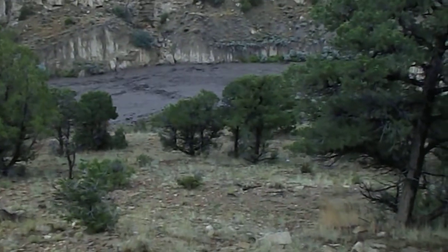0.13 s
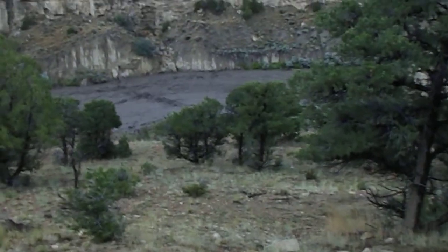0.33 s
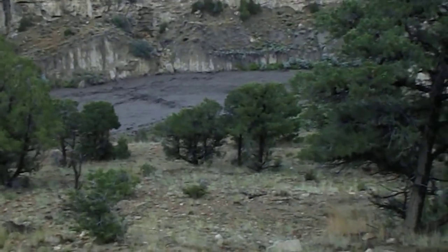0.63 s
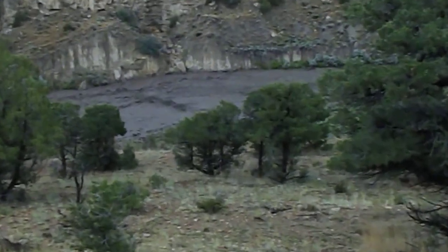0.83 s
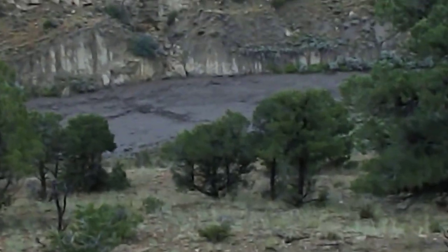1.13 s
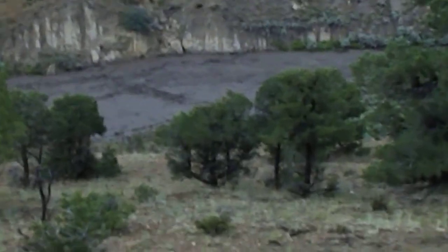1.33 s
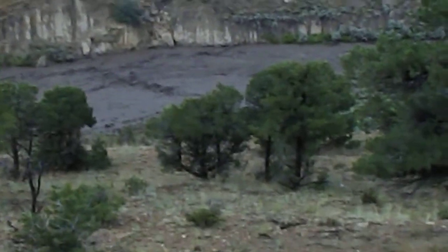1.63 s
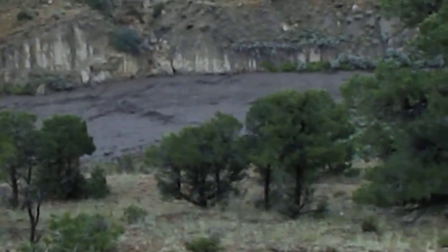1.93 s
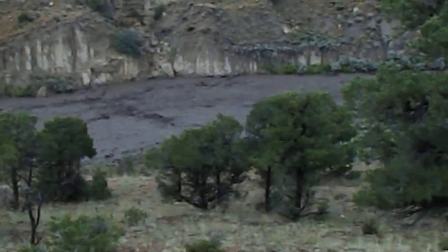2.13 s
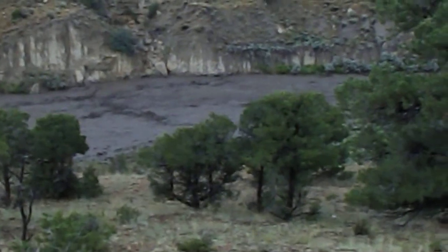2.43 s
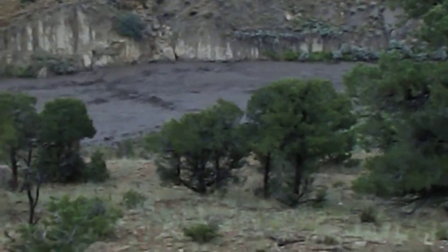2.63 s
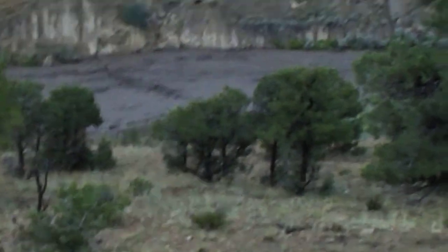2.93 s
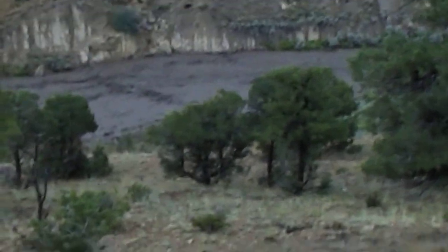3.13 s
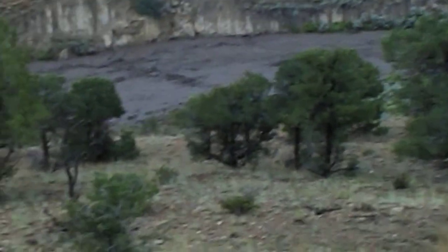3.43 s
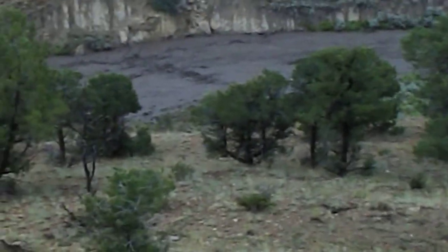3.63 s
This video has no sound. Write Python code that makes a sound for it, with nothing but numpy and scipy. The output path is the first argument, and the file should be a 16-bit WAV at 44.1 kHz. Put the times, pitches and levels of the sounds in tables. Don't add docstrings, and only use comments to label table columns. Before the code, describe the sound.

A distant muddy flood rushes continuously for about four seconds, a dull low-mid roar with blurred stone knocks and thin spray hiss. It swells slightly around 1.1 and 2 seconds and is weakest at the end. At 1.44-1.47 seconds a close plastic button snaps in a rapid cluster, clipping and briefly ducking the water; a single lighter click follows at 2.11. Open valley, band-limited handheld camera microphone.

```python
import sys
import numpy as np
from scipy import signal
from scipy.fft import rfft, irfft, next_fast_len
from scipy.io import wavfile
from scipy.ndimage import uniform_filter1d, map_coordinates

SR = 44100
rng = np.random.default_rng(int(sys.argv[2]) if len(sys.argv) > 2 else 0)


def gain_from_decibels(decibels):
    exponent = np.asarray(decibels, float) / 20
    return 10 ** exponent


def digitize_waveform(pressure):
    field = np.atleast_2d(pressure).T
    bounded = np.clip(field, -1, 1)
    quanta = np.round(bounded * 32767).astype(np.int16)
    wavfile.write(sys.argv[1], SR, quanta)


N = 166257


def unit(x):
    return x / np.sqrt(np.mean(x ** 2) + 1e-20)


def along(points, hz):
    point_hz, level_db = np.transpose(points)
    return np.interp(np.log(hz + 1), np.log(point_hz + 1), level_db)


def wobble(knots_per_s):
    knots = rng.standard_normal(int(N * knots_per_s / SR) + 4)
    return map_coordinates(knots, [np.arange(N) * knots_per_s / SR])


def filtered(x, response):
    size = next_fast_len(N + 8192)
    gain = response(np.fft.rfftfreq(size, 1 / SR))
    return irfft(rfft(x, size) * gain, size)[:N]


def smooth(x, tau_s):
    keep = np.exp(-1 / (abs(tau_s) * SR))
    return signal.lfilter([1 - keep], [1, -keep], x)


def rush(spectrum, patchy_db):
    z = signal.stft(rng.standard_normal(N + 512), nperseg=512)[2]
    patches = uniform_filter1d(rng.standard_normal(z.shape), size=4, axis=0)
    patches = uniform_filter1d(patches, size=12, axis=1)
    x = signal.istft(z * gain_from_decibels(patchy_db * unit(patches)), nperseg=512)[1][:N]
    return unit(filtered(x, lambda hz: gain_from_decibels(along(spectrum, hz))))


# start_s, level_db
SURGES = [
    (0.0, -34),
    (0.84, -33),
    (1.13, -31.5),
    (1.61, -33),
    (1.99, -32),
    (2.26, -33.5),
    (3.08, -32.5),
    (3.26, -33.5),
    (3.77, -34.5),
]


def flood():
    start_s, level_db = np.transpose(SURGES)
    strength_db = np.interp(np.arange(N) / SR, start_s, level_db)
    mean_db = strength_db.mean()
    surge_db = strength_db - mean_db
    shared_db = 0.48 * wobble(9)
    low = roar(surge_db + shared_db)
    high = spray(surge_db, shared_db)
    return gain_from_decibels(mean_db + 1.11) * (low + high)


# pitch_hz, level_db (per Hz)
ROAR_COLOUR = [(18, -72), (30, -50), (64, -45), (118, -27), (241, -15), (427, -13), (560, -3.5), (870, 0),
               (1600, -11.5), (1850, -23.5), (2470, -56), (4180, -120)]


def roar(drive_db):
    stones_db = -9
    gain = gain_from_decibels(drive_db + .3 * wobble(3))
    return gain * (rush(ROAR_COLOUR, patchy_db=-0.12) + gain_from_decibels(stones_db) * stones())


def stones():
    stones_per_s, centre_hz, cycles = 400, 846, 4
    count = 1500
    u = rng.random((count, 2))
    pitch, size = rng.standard_normal(count), rng.exponential(1, count)
    hz = centre_hz * np.exp(.22 * pitch)[:, None]
    t = np.arange(600) / SR
    phase = t * hz / cycles
    heard = u[:, 1] < stones_per_s * N / SR / count
    level = (heard * gain_from_decibels(1.8 * size))[:, None]
    knock = level * phase * np.exp(-4 * phase) * np.sin(2 * np.pi * hz * t)
    at = (u[:, :1] * N).astype(int) + np.arange(len(t))
    return unit(np.bincount(at.ravel(), knock.ravel())[:N])


# pitch_hz, level_db (per Hz)
SPRAY_COLOUR = [(1060, -32), (1850, -5.5), (2300, -1), (2850, -5.5), (3330, -14), (3750, -7), (5160, -13.5),
                (5900, -32.5), (7500, -57), (12700, -120)]


def spray(surge_db, shared_db):
    under_roar_db, follows = -9.5, 0.67
    gain = gain_from_decibels(follows * surge_db + shared_db + 0.25 * wobble(2))
    return gain_from_decibels(under_roar_db) * gain * rush(SPRAY_COLOUR, patchy_db=-0.1)


# start_s, level_db, upper_modes_db, upper_slope_db_per_octave, pitch_factor
CONTACTS = [(1.43837, 3, 3, 0, 1.03), (1.43955, 0, 1, -12, 1.045), (1.44144, -7.5, 2, -4, 1.025),
            (1.44829, -9, -3, -12, .975), (1.45368, -4, -1, -5, .965), (1.45582, 1.5, 10, -9, .963),
            (1.45769, 13.5, 0, 8, 1.004), (1.45935, 8.3, -10, 0, 1.007), (1.46213, -7, 8, -8, 1.04),
            (1.46357, 2.5, -8, 7, 1.047), (1.46592, -4, 5, -6, 1.06), (1.46957, -8, 12, -6, 1.06),
            (2.11237, 6, -12, 8, 1.002)]
# pitch_hz, level_db, t60_s
SHELL = [(1470, -12, .0066), (1796, 1, .0073), (2176, -14.5, .022), (2720, -20.5, .02), (3220, -20.5, .011),
         (3800, -22, .008), (4150, -33, .02), (4960, -29, .011)]
# pitch_hz, level_db (per Hz)
CRACK_COLOUR = [(1500, -40), (2600, -2), (3300, 0), (4000, -9), (4800, -7), (5500, -27), (6300, -40)]


def button():
    rise_cycles, upper_hz = 3.2, 2200
    crack_db, crack_t60_s = -15, .005
    rings, cracks = np.zeros(N), np.zeros(N)
    t = np.arange(2000) / SR
    column_t = t[:, None]
    mode_hz, mode_db, t60_s = np.transpose(SHELL)
    upper = mode_hz > mode_hz[1]
    octaves = np.log2(mode_hz / upper_hz)
    noises = rng.standard_normal((len(CONTACTS), len(t)))
    for (start_s, level_db, upper_db, slope_db, pitch), noise in zip(CONTACTS, noises):
        start = round(start_s * SR)
        hz = mode_hz * pitch
        balance_db = upper * (upper_db + slope_db * octaves)
        decay = gain_from_decibels(mode_db + balance_db - 60 * column_t / t60_s)
        rise = 1 - np.exp(-column_t * hz / rise_cycles)
        ring = decay * rise * np.sin(2 * np.pi * hz * column_t)
        rings[start:][:len(t)] += gain_from_decibels(level_db) * ring.sum(axis=1)
        cracks[start:][:len(t)] += gain_from_decibels(level_db + crack_db - 60 * t / crack_t60_s) * noise
    return rings + filtered(cracks, lambda hz: gain_from_decibels(along(CRACK_COLOUR, hz)))


def scene():
    return (flood() + button())[None]


def duck(x):
    threshold_db, grows = -23, 1.05
    lag_s, rise_s, fall_s = .009, .004, .009
    late = np.roll(x, round(lag_s * SR))
    power = smooth(smooth(late ** 2, rise_s), fall_s)
    return x * (1 + power / gain_from_decibels(2 * threshold_db)) ** (-grows / 2)


def narrow(x):
    fade_hz, top_hz, fade_db = 5850, 6290, -24

    def response(hz):
        across = np.clip((hz - fade_hz) / (top_hz - fade_hz), 0, 1)
        return (hz < top_hz) * gain_from_decibels(fade_db * across ** 2)
    return filtered(x, response)


def roll_off(x):
    return signal.sosfilt(signal.butter(12, 15700, fs=SR, output="sos"), x)


def record(dry):
    x = narrow(duck(dry[0]))
    x = np.clip(x, -.73, .705)
    return roll_off(x[None])


dry = scene()
out = record(dry)
digitize_waveform(out)
```